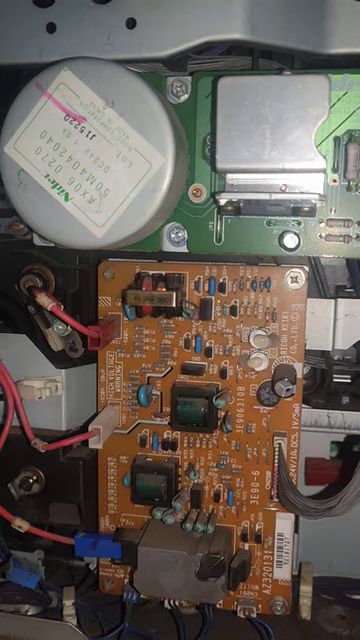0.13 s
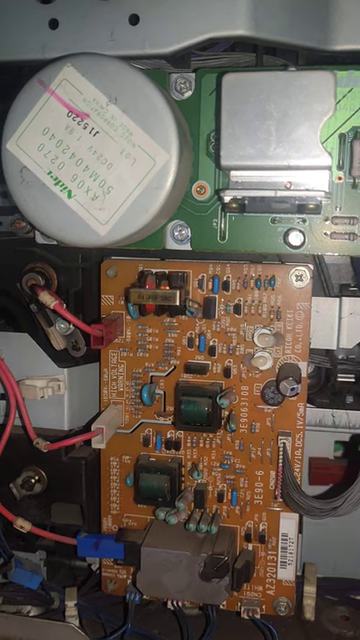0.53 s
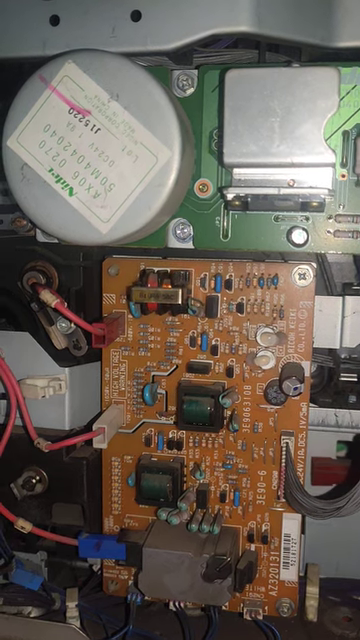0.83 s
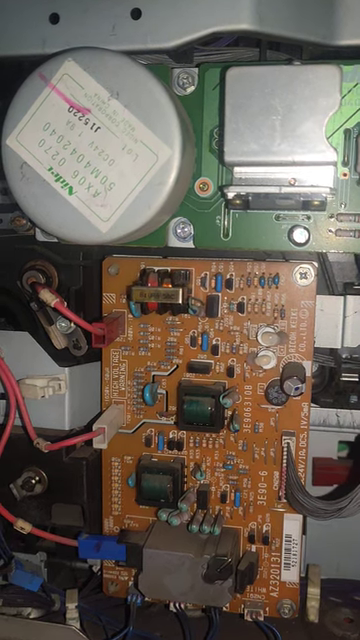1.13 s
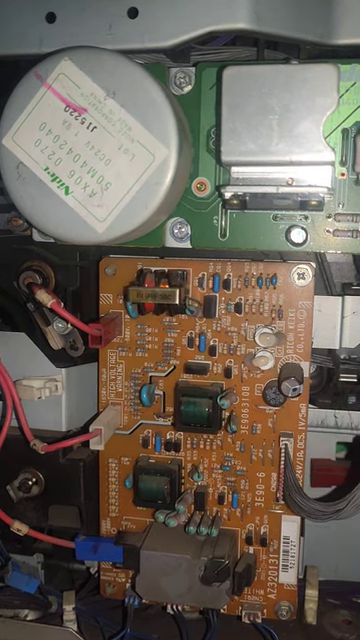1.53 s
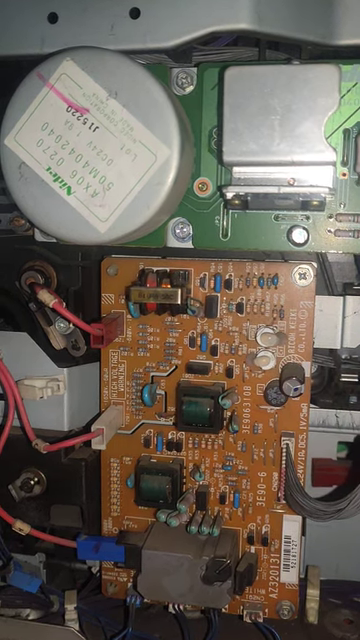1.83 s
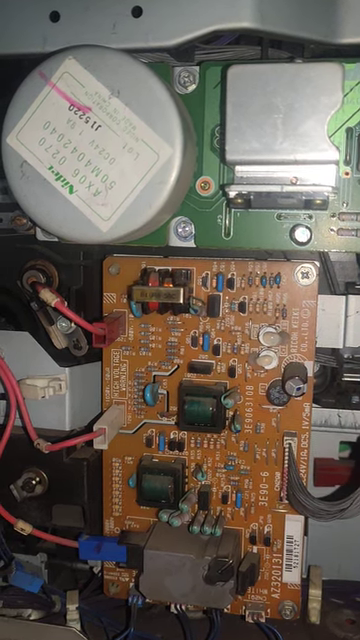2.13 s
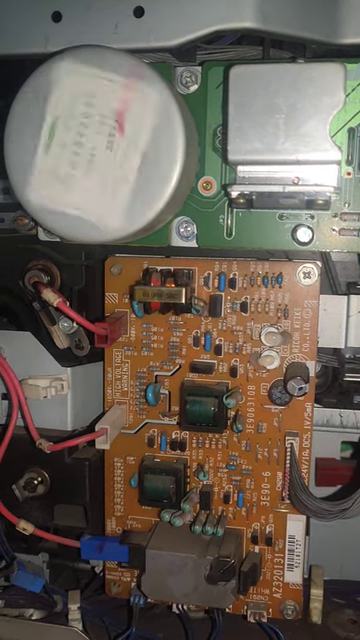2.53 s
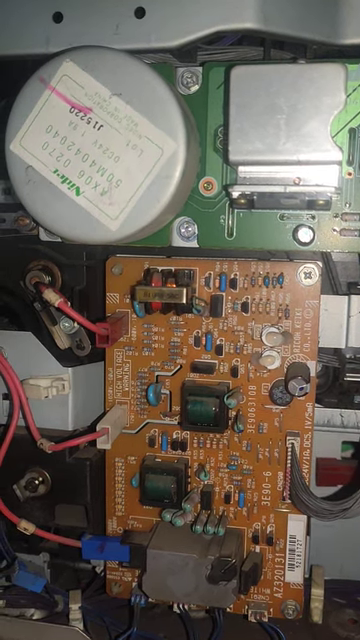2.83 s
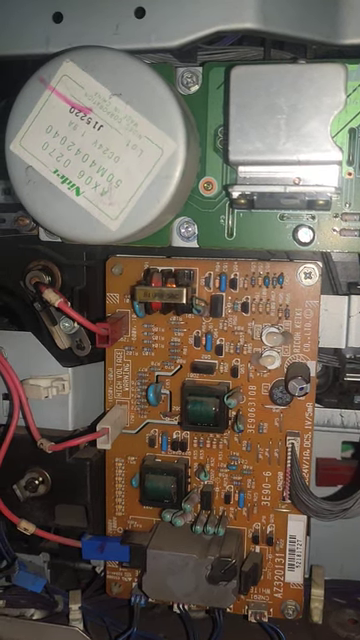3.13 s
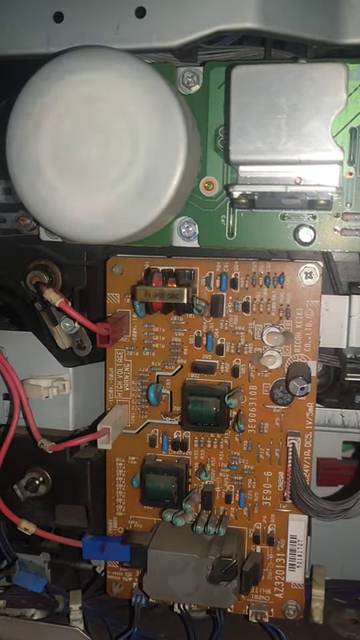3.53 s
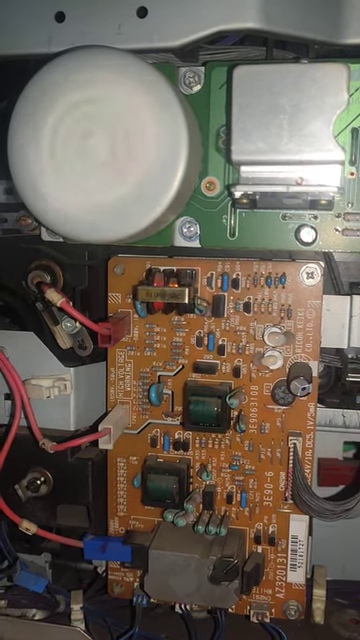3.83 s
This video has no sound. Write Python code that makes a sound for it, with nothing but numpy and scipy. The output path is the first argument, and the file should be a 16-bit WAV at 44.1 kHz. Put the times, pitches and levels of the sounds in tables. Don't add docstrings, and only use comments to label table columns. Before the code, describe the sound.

Copier drive parts clunk, recorded close by hand in a quiet ventilated room. After a quick fade-in, a very faint whine glides down over low handling rumble. A relay snaps with a knock around 1.4 s, another clicks at 2.18. The loudest sharp clutch slam hits at 2.48, with small rattles until 2.8. At 3.46 a catch clicks, a strong clunk follows at 3.55, and the motor whirs with a brief high whistle to the end.

```python
import sys
import numpy as np
from scipy import signal
from scipy.fft import rfft, irfft, next_fast_len
from scipy.io import wavfile
from scipy.ndimage import map_coordinates

SR = 44100
rng = np.random.default_rng(int(sys.argv[2]) if len(sys.argv) > 2 else 0)


def voltage_ratio(level):
    return 10 ** (np.asarray(level, float) / 20)


def generate_wav(signal):
    frames = np.transpose(np.atleast_2d(signal))
    scaled = np.clip(frames, -1, 1) * 32767
    pcm = np.round(scaled).astype(np.int16)
    wavfile.write(sys.argv[1], SR, pcm)


N = 176400
T = np.arange(N) / SR
SPEED_S = 3.56
SIDES = np.array([[1], [-1]])

# frequency in Hz, level in dB per Hz.
THUD_TONE = [(41, -40), (70, -4), (316, -3), (391, -7.5), (474, -1.5), (551, -2), (719, -9.5), (900, -6.5),
             (1170, -38), (1980, -120)]


def at_hz(points, hz):
    p = np.array(points)
    return np.interp(np.log(hz + 1.), np.log(p[:, 0]), p[:, 1])


def rms_one(x):
    return x / np.sqrt(np.mean(x ** 2) + 1e-20)


def drift(rate):
    coarse = T[::64]
    points = rng.standard_normal(int(N / SR * rate) + 3)
    slow = map_coordinates(points, [coarse * rate], order=3)
    return np.interp(T, coarse, slow)


def bands(spectrum, size):
    hz = np.arange(size // 2 + 1) * SR / size
    octaves = np.arange(5.5, 14.5, .5)
    noise = rfft(rng.standard_normal(size)) * voltage_ratio(at_hz(spectrum, hz))
    parts = []
    for octave in octaves:
        share = np.clip(1 - 2 * abs(np.log2(hz + 1) - octave), 0, 1)
        parts.append(irfft(noise * share, size))
    parts = np.array(parts)
    return 2 ** octaves, parts / np.std(parts.sum(0))


def steady(spectrum, patchy_db, size=N):
    _, parts = bands(spectrum, size)
    noise = sum(p * voltage_ratio(patchy_db * drift(14)[:size]) for p in parts)
    return np.pad(noise, (N - size, 0))


def tone(hz, db, wobble_db, blur):
    level = np.sqrt(2) * voltage_ratio(db + wobble_db * drift(30))
    phase = 2 * np.pi * np.cumsum(hz + 0 * T) / SR
    return level * np.sin(phase + blur * drift(45) + rng.uniform(0, 5.7))


def ring(force, hz, t60):
    r, w = voltage_ratio(-60 / (t60 * SR)), 2 * np.pi * hz / SR
    return signal.lfilter([0, np.sin(w)], [1, -2 * r * np.cos(w), r * r], force + 1e-18)


def blows(rows, spectrum, modes=(), modes_db=-8):
    tail_t60_s, lows_last = 0.56, 0.29
    patch_db, patch_s = 3.0, .012
    size = 16384
    out = np.zeros(N + SR)
    t = np.arange(size) / SR
    knots = np.arange(0, size / SR + patch_s, patch_s)
    for s, db, rise, t60, tail_db in rows:
        hz, parts = bands(spectrum, size)
        longer = (1000 / hz[:, None]) ** lows_last
        crack = voltage_ratio(-60 * t / (t60 * longer))
        tail = voltage_ratio(tail_db - 60 * t / (tail_t60_s * longer))
        patches = [np.interp(t, knots, rng.standard_normal(len(knots)) * (knots > 0)) for _ in hz]
        fall = (crack + tail) * voltage_ratio(patch_db * np.array(patches))
        onset = np.minimum(t / (rise * np.maximum(longer, 1) ** 3), 1) ** 2
        blow = 0.47 * (parts * fall * onset).sum(0)

        push_s = rise + .001
        force = rng.standard_normal(size) * (t < push_s) * t / push_s
        force = force / np.sqrt((force ** 2).sum())
        for f, level_db, ring_s in modes:
            level = voltage_ratio(modes_db + level_db + 2.1 * rng.normal())
            blow += level * ring(force, f, np.clip(ring_s, .01, .4))
        i = int((s - rise) * SR)
        out[i:i + size] += voltage_ratio(db) * blow
    return out[:N]


def low_cut(x):
    return signal.sosfilt(signal.butter(2, 130, "high", fs=SR, output="sos"), x)


def coasting():
    # multiple of speed, level in dB, change in dB per s.
    tones = [(1.0, -90, 0), (2.0, -82, .3), (2.555, -85, 1.2), (4.0, -92, 2)]
    # frequency in Hz, width in Hz, boost in dB.
    panels = [(1570, 253, 13), (1850, 150, 6), (3180, 150, 7), (3650, 250, 7), (4940, 250, 8),
              (1194, 200, -8), (2200, 120, 11), (2500, 85, 13), (2360, 40, -2), (2750, 150, 4),
              (4300, 250, -6)]
    start_hz, friction_hz, drag_s = 2105, 558, 5.0
    speed = start_hz * np.exp(-T / drag_s) - friction_hz
    out = 0
    for k, db, change in tones:
        hz = k * speed
        lift = sum(boost * np.exp(-((hz - f) / width) ** 2) for f, width, boost in panels)
        out = out + tone(hz, db + change * T + lift, 2.5, .6)
    return out * (T < SPEED_S)


def office():
    # frequency in Hz, level in dB per Hz.
    room_tone = [(50, -7), (85, -6.5), (245, 1), (325, -9), (560, -12.5), (1060, -22), (7450, -30.5),
                 (14500, -34.5)]
    mid, side = steady(room_tone, 0.8), steady(room_tone, 0.86)
    side = signal.lfilter(*signal.butter(1, 900, "high", fs=SR), side) + .35 * side
    noise = voltage_ratio(-60 - 1.5) * (mid + 0.8 * side * SIDES)
    return noise + tone(1070, -82.5, 2.2, 0.59)


def grip():
    # start in seconds, length in seconds, level in dB, top frequency in Hz.
    squeezes = [
        (0.0, 0.59, -42.5, 15),
        (0.875, 0.19, -44, 41.6),
        (1.04, 0.21, -53, 51),
        (1.194, 0.55, -57, 56),
        (2.304, 1, -63, 40.3),
    ]
    rumble = (-0.81, 8.2, -60.5, 41.7)
    out = 0
    for s, length, db, hz in list(squeezes) + [rumble]:
        sos = signal.butter(3, [5, hz], "band", fs=SR, output="sos")
        mid, side = signal.sosfilt(sos, rng.standard_normal((2, N)))
        gate = np.clip(np.minimum((T - s) / 0.14, s + length - T) / (0.5 * length), 0, 1)
        out = out + voltage_ratio(db) * gate * rms_one(mid + .3 * side * SIDES)
    return out


def hisses():
    # start in seconds, length in seconds, level in dB, centre in Hz, width in Hz.
    puffs = [
        (.205, 0.09, -61.5, 3900, 2800),
        (1.08, .32, -70, 900, 1000),
        (.75, .6, -66, 200, 120),
        (2.66, 0.341, -74, 7750, 800),
        (2.55, 0.45, -76, 12000, 4000),
    ]
    out = 0
    for s, length, db, hz, width in puffs:
        sos = signal.butter(2, [hz - width / 2, hz + width / 2], "band", fs=SR, output="sos")
        noise = rms_one(signal.sosfilt(sos, rng.standard_normal(N)))
        gate = np.clip(np.minimum(T - s, s + length - T) / 0.0078, 0, 1)
        out = out + voltage_ratio(db + 1.8 * drift(60)) * gate * noise
    return out


def knocks():
    # time in seconds, peak in dB, rise in seconds, ring t60 in seconds, tail in dB.
    hits = [(1.21, -59, 0.021, 0.22, 0), (1.255, -55.5, 0.0092, 0.11, -15), (1.319, -53, 0.0043, 0.05, -5),
            (1.445, -26, 0.0011, 0.04, -13.5), (1.456, -50, 0.0013, .1, -17),
            (2.621, -35.5, .002, 0.04, -19.5), (2.648, -34, 0.002, 0.075, -17),
            (2.655, -51, 0.0013, 0.026, -29), (2.664, -38.5, 0.0013, 0.037, -29),
            (2.744, -50.5, 0.0027, 0.081, -23), (2.8, -54.5, 0.0017, 0.051, -16)]
    # frequency in Hz, level in dB per Hz.
    colour = [(200, -9.5), (350, -32), (850, -11), (2000, -10.5), (4500, -14.5), (6000, -21.5),
              (10000, -34)]
    # frequency in Hz, level in dB, t60 in seconds.
    modes = [(355.4, -17, 0.2), (830, -1.5, 0.036), (1155, -2.5, 0.052), (2162, -9.5, 0.069),
             (2730, -21, 0.03)]
    return blows(hits, colour, modes)


def relay_snaps():
    # time in seconds, peak in dB, rise in seconds, ring t60 in seconds, tail in dB.
    snaps = [
        (1.389, -29.5, 0.003, 0.14, -6.5),
        (1.394, -32.5, 0.000926, 0.11, -3.5),
    ]
    # frequency in Hz, level in dB per Hz.
    colour = [(240, -18), (400, -17.5), (1370, -8), (1520, -17), (4600, -15), (5270, -17), (7030, -4.5),
              (13300, -21), (15000, -38)]
    # frequency in Hz, level in dB, t60 in seconds.
    modes = [(1310, -18, 0.12), (2270, -7, 0.11), (6400, -7, 0.04), (7050, 8, 0.03), (7700, 3, 0.03)]
    return blows(snaps, colour, modes)


def thuds():
    # time in seconds, peak in dB, rise in seconds, ring t60 in seconds, tail in dB.
    jolts = [
        (1.45, -35, 0.0048, 0.16, -17.5),
        (2.185, -37, 0.0052, 0.15, -13.5),
        (2.482, -32, 0.0046, 0.31, -25),
        (3.5, -34, .02, 0.32, -8),
        (3.56, -34, 0.0093, 0.22, -21),
    ]
    return blows(jolts, THUD_TONE)


def latch():
    # time in seconds, peak in dB, rise in seconds, ring t60 in seconds, tail in dB.
    clicks = [
        (2.168, -51, 0.0014, 0.11, -17),
        (2.174, -34.5, 0.002, 0.18, -14.5),
        (2.1795, -27.5, 0.0011, 0.042, -11.5),
        (2.191, -38, .001, 0.041, -15.5),
    ]
    # frequency in Hz, level in dB per Hz.
    colour = [(140, -34), (240, -5), (739, -8), (879, -12.5), (1350, -9), (5130, -8.5), (7910, -5),
              (14000, -33.5), (15000, -42)]
    # frequency in Hz, level in dB, t60 in seconds.
    modes = [(726, -11.5, 0.12), (1406, -9, 0.11), (2412, -17, 0.23), (3820, -11, 0.045), (6000, 1, 0.046),
             (7640, 9.5, 0.028), (8140, 3.5, 0.025)]
    return blows(clicks, colour, modes)


def clutch():
    # time in seconds, peak in dB, rise in seconds, ring t60 in seconds, tail in dB.
    slams = [
        (2.471, -55, 0.00067, .1, -23),
        (2.4765, -8.5, 0.00053, 0.048, -22.5),
        (2.492, -36, 0.00088, .04, -25),
    ]
    # frequency in Hz, level in dB per Hz.
    colour = [(240, -29), (400, -20.5), (1200, -5), (3150, 0.5), (4200, -4.5), (5800, -0.5), (13300, -18),
              (15000, -41)]
    # frequency in Hz, level in dB, t60 in seconds.
    modes = [(349, -18, 0.23), (524.4, -23.5, 0.19), (1201, -15, 0.086), (2033, -18, 0.037),
             (2300, -7.5, 0.059), (3170, -3, 0.032), (3770, -14.5, 0.045), (5050, -11, 0.037),
             (5820, -4, 0.02), (7560, -2.5, 0.02)]
    return blows(slams, colour, modes)


def pawl():
    # time in seconds, peak in dB, rise in seconds, ring t60 in seconds, tail in dB.
    drops = [
        (3.462, -27, 0.0018, 0.035, -26),
        (3.471, -36, 0.0012, .05, -22),
    ]
    # frequency in Hz, level in dB per Hz.
    colour = [(350, -39), (600, -22), (1530, -3), (2880, -10), (3240, -3), (9550, -12.5), (14000, -36)]
    # frequency in Hz, level in dB, t60 in seconds.
    modes = [(1300, -8.5, 0.059), (2610, 0, 0.034), (3200, 2, 0.054), (4810, -3, 0.028)]
    return blows(drops, colour, modes)


def motor():
    # frequency in Hz, level in dB per Hz.
    noise_tone = [(50, -16), (300, -8), (600, -11.5), (1530, -13), (8300, -25), (9400, -47), (11000, -32),
                  (14500, -42.5)]
    # multiple of the mesh rate, level in dB.
    mesh_tones = [(1, -64), (2, -49.5), (3, -58.5), (3.5, -73), (4, -59), (5, -59.5), (6, -60), (6.5, -81),
                  (7, -71), (9, -62), (11, -58.5), (15, -62)]
    # frequency in Hz, level in dB.
    shafts = [(113, -60.5), (174, -55), (237, -57.5), (307, -52), (673, -57)]
    # time in seconds, level in dB.
    whistle_levels = [(3.56, -62), (3.59, -48.5), (3.65, -44), (3.72, -52), (3.77, -54), (3.83, -61.5),
                      (3.9, -54.5), (3.95, -58), (4.0, -59)]
    on_s, mesh_hz = 3.465, 279.95
    creep_db, over_db, settle_s = -0.5, 3, 0.026
    whistle_hz, sag_hz_per_s = 3968, 200

    run = np.clip((T - on_s) / (SPEED_S - on_s), 0, 1)
    since = np.maximum(T - SPEED_S, 0)
    overshoot_db = over_db * run * np.exp(-since / settle_s)
    level = (run > 0) * voltage_ratio(creep_db * (3.0 - run ** 2) + overshoot_db)
    gears = sum(tone(k * mesh_hz, db, 3.5, 0.43) for k, db in mesh_tones)
    gears = gears + sum(tone(hz, db, 4.0, 0.48) for hz, db in shafts)
    hz = whistle_hz - sag_hz_per_s * since
    db = np.interp(T, *np.transpose(whistle_levels))
    whistle = tone(hz, db, 1.6, 0.8) + tone(2 * hz, db - 6, 1.1, 1.6)
    noise = voltage_ratio(-44.5) * steady(noise_tone, 2.1, size=24000)
    return level * noise + run ** 3 * level * gears + (since > 0) * whistle


def engage():
    # time in seconds, peak in dB, rise in seconds, ring t60 in seconds, tail in dB.
    clunks = [
        (3.527, -29.5, .003, 0.06, -37),
        (3.549, -14, 0.0018, 0.051, -21),
        (3.555, -36.5, .001, .05, -25),
    ]
    # frequency in Hz, level in dB per Hz.
    colour = [(180, -31), (300, -5.5), (1620, -8), (2070, 1.5), (5710, -6.5), (6840, -2), (9960, -22),
              (13600, -39), (15000, -44)]
    # frequency in Hz, level in dB, t60 in seconds.
    modes = [(545, -17, 0.23), (1200, -5, 0.046), (2110, -8.5, 0.024), (2480, -1.5, .03),
             (3220, -13, 0.034), (4070, -2, .03), (4690, -4, 0.016), (6800, 0, 0.017), (8150, 1, 0.024)]
    return blows(clunks, colour, modes)


def lurch():
    # time in seconds, peak in dB, rise in seconds, ring t60 in seconds, tail in dB.
    heave = [
        (3.578, -35, 0.018, 0.096, -28),
    ]
    # frequency in Hz, level in dB, t60 in seconds.
    modes = [(115, 4.5, 0.77), (169, 6, 0.39), (235, 2, 0.36), (300, 7.5, 0.22), (561, 5, 0.26),
             (645, 0, 0.18)]
    return blows(heave, THUD_TONE, modes)


def ports(x, lean, case_db):
    case_s, lag_s, most_turn = .011, 0.00033, 1.535
    size = next_fast_len(N + 2000)
    hz = np.arange(size // 2 + 1) * SR / size
    out = []
    for side in (1, -1):
        lags = rng.uniform(0.22, 1.6, 40) ** 2
        echoes = np.zeros(size)
        echo_levels = voltage_ratio(case_db - 5 - 20 * lags)
        echoes[(lags * case_s * SR).astype(int)] = rng.choice([-1, 1], 40) * echo_levels
        turn = np.exp(.5j * side * most_turn * np.tanh(2 * np.pi * hz * lag_s / most_turn))
        path = (1 + rfft(echoes) * hz / (hz + 700)) * voltage_ratio(side * at_hz(lean, hz) / 2) * turn
        out.append(irfft(rfft(x, size) * path, size)[:N])
    return np.array(out)


def scene():
    # frequency in Hz, difference in dB.
    lean_blows = [(60, 3.5), (240, -2), (950, 1), (3770, -2), (15000, 10)]
    lean_latch = [(60, -2.5), (240, -3.5), (950, 3.0), (3770, -0.5), (15000, 12)]
    lean_clutch = [(60, 5), (240, 2), (950, -1), (3770, -1), (15000, 11)]
    lean_engage = [(60, 6), (240, 2), (950, -2.5), (3770, -2), (15000, 12)]
    lean_motor = [(110, 4.5), (240, -2), (800, 5.5), (2400, -4), (4400, -2.5), (8100, 12), (15000, 1.5)]
    case_db = -10.5
    first = low_cut(relay_snaps() + knocks() + thuds())
    near = ports(first + lurch(), lean_blows, case_db)
    near += ports(latch(), lean_latch, case_db)
    near += ports(low_cut(clutch()), lean_clutch, case_db)
    near += ports(engage() + pawl(), lean_engage, case_db)
    whirr = ports(motor() + hisses() + coasting(), lean_motor, -20)
    return near + whirr + office() + grip()


def band_limit(x):
    return signal.sosfilt(signal.butter(12, 15630, fs=SR, output="sos"), x)


def record(dry):
    dip_hz, dip_width_hz = 9350, 1900
    dry = dry - .6 * signal.lfilter(*signal.iirpeak(dip_hz, dip_hz / dip_width_hz, fs=SR), dry)
    dry = signal.sosfilt(signal.cheby2(10, 30, 14850, fs=SR, output="sos"), dry)
    fade = np.clip((T - .07) / .22, 0, 1) ** 0.62
    return band_limit(dry * fade)


dry = scene()
out = record(dry)
generate_wav(out)
```